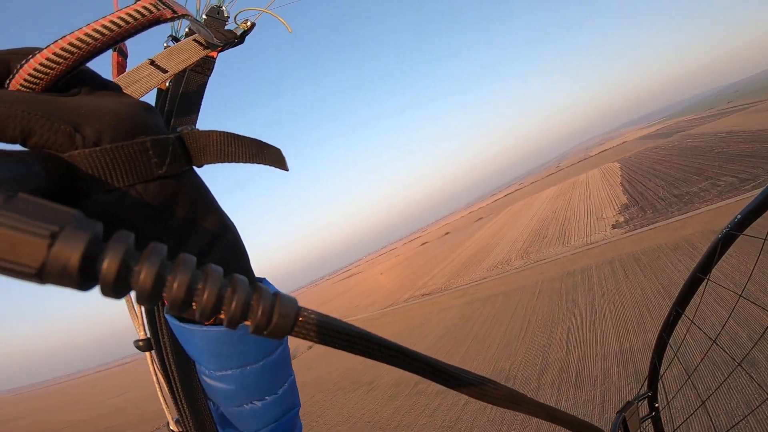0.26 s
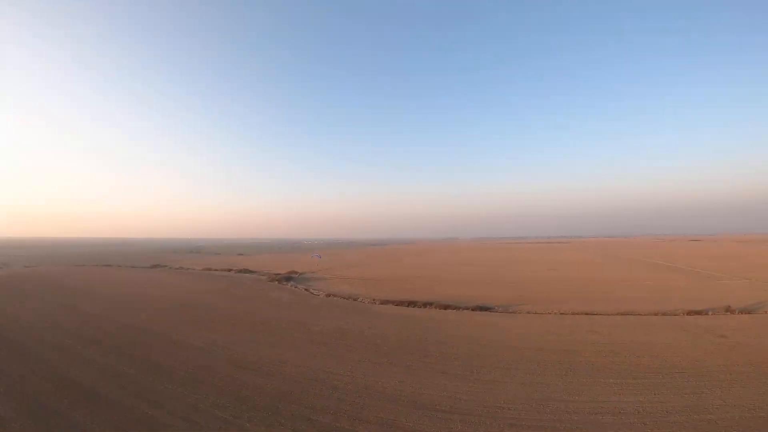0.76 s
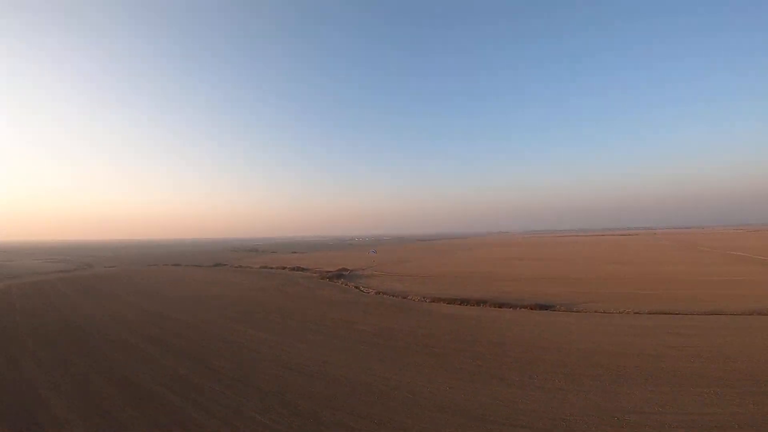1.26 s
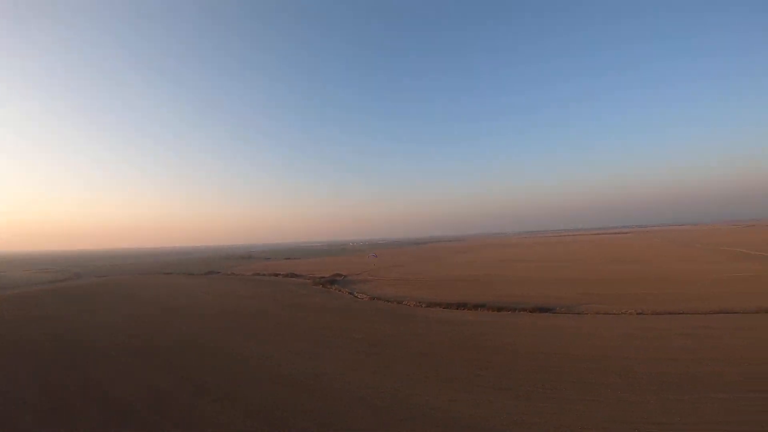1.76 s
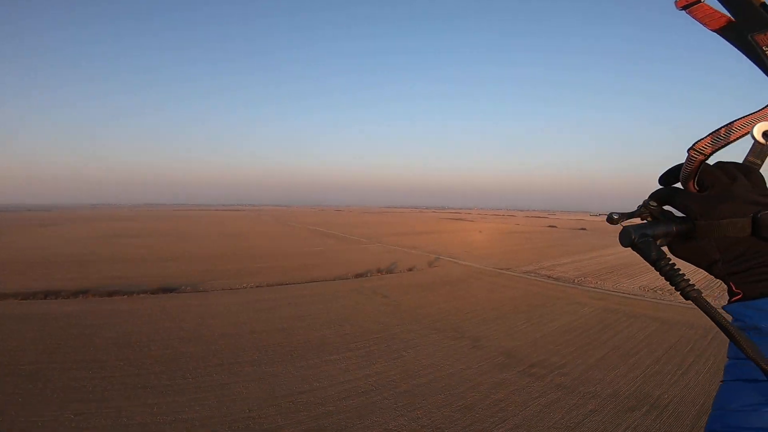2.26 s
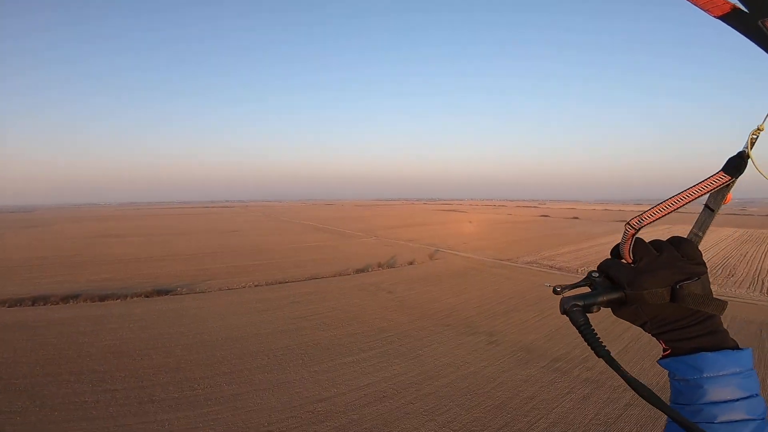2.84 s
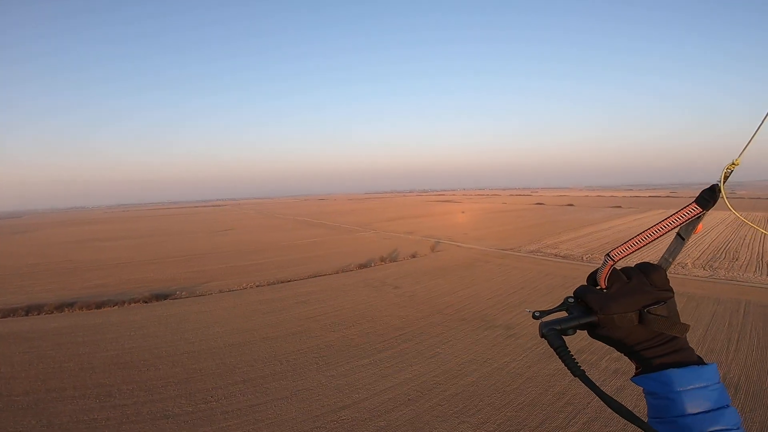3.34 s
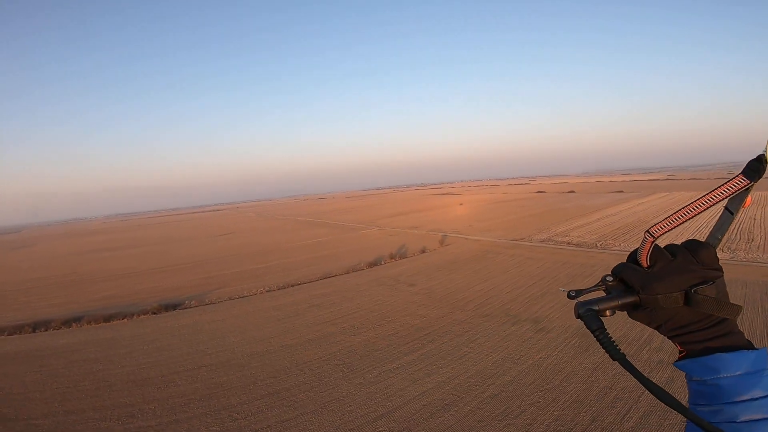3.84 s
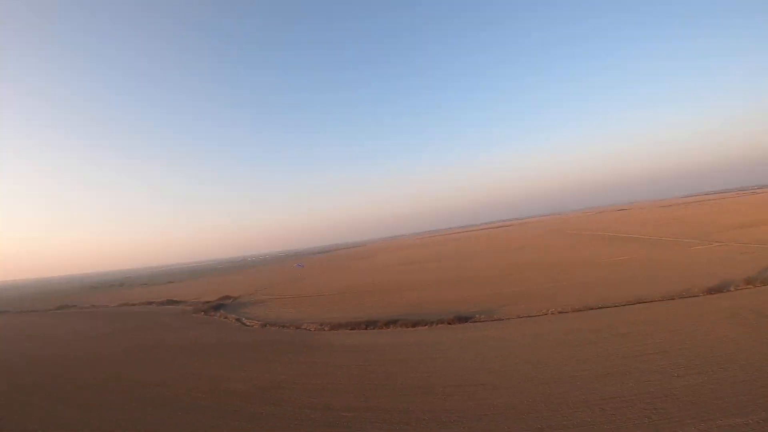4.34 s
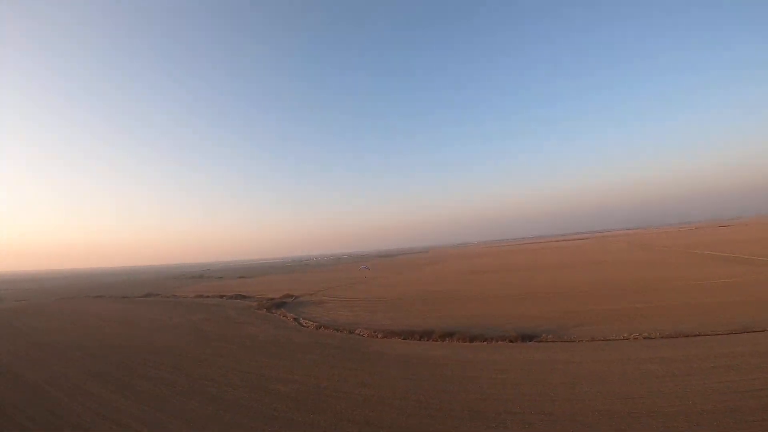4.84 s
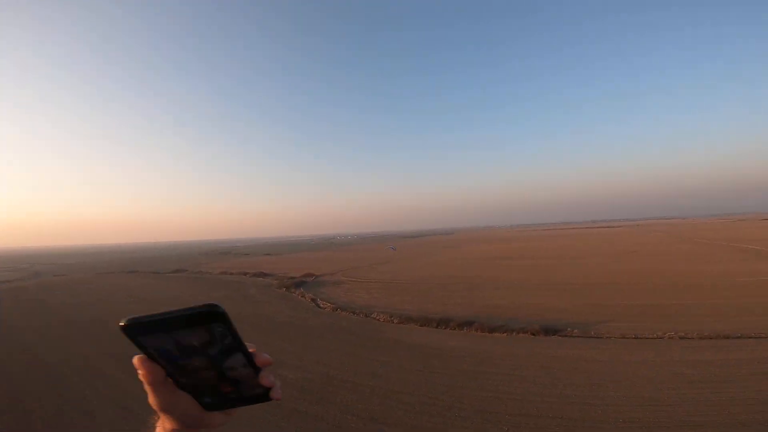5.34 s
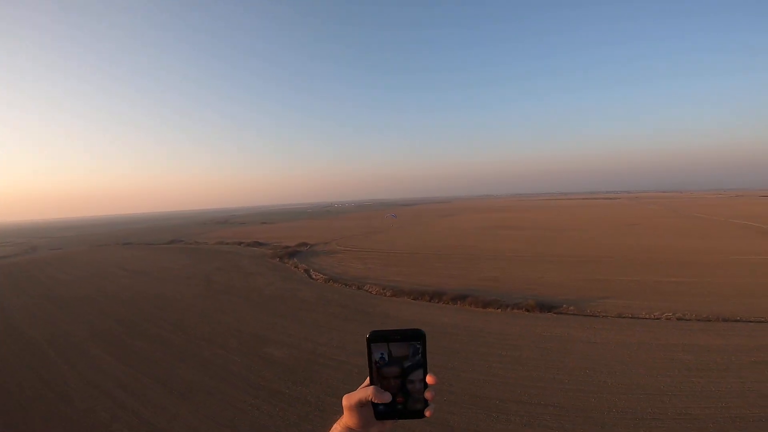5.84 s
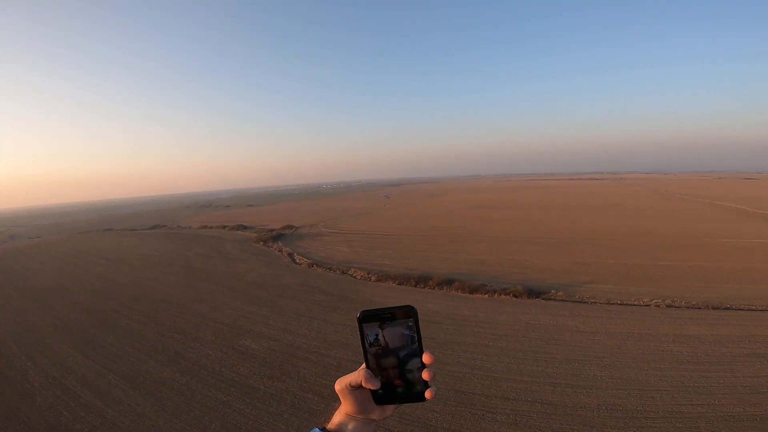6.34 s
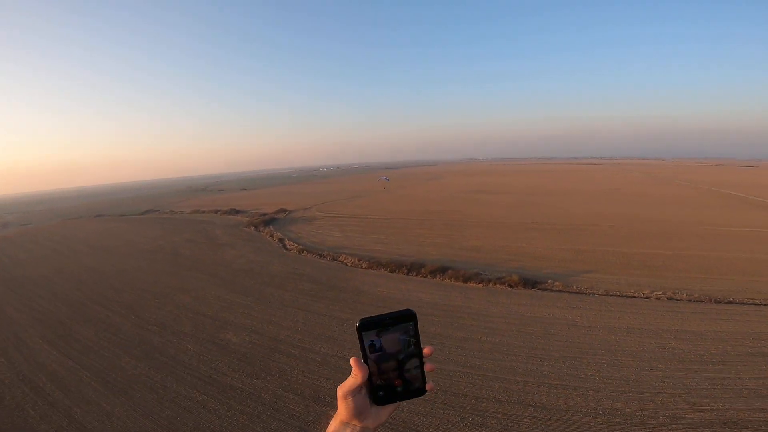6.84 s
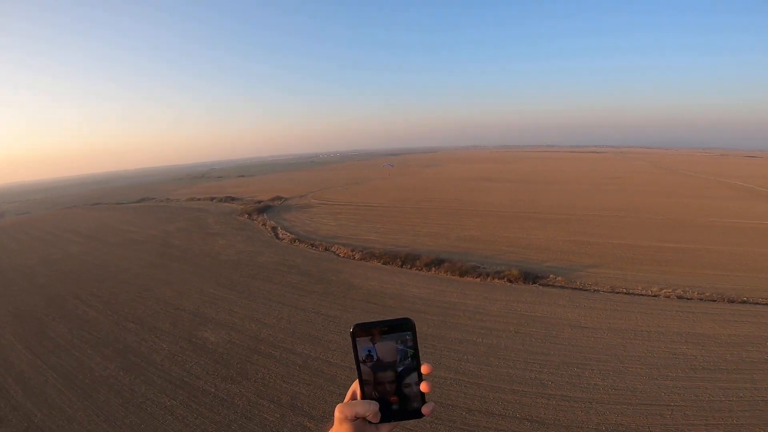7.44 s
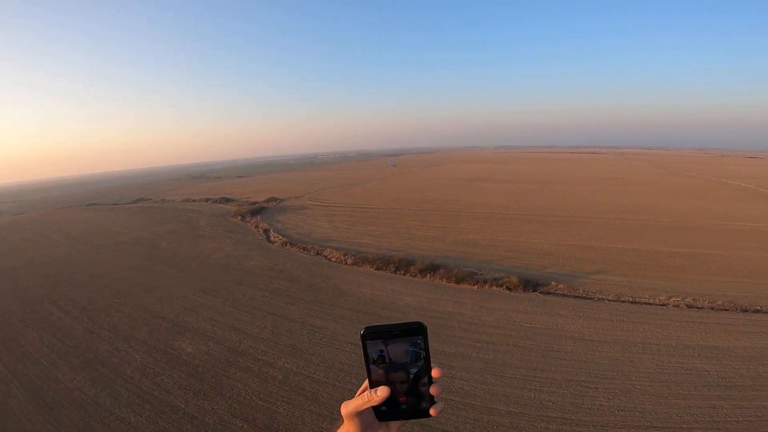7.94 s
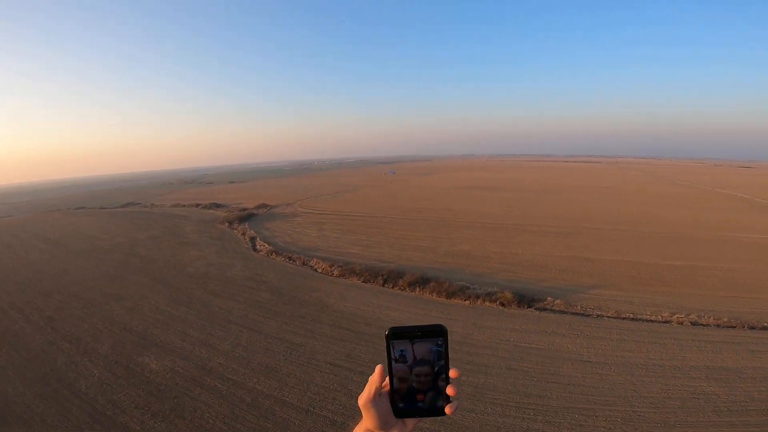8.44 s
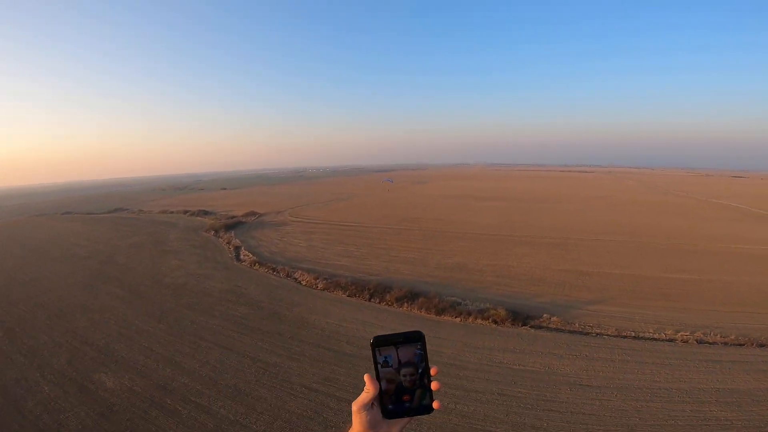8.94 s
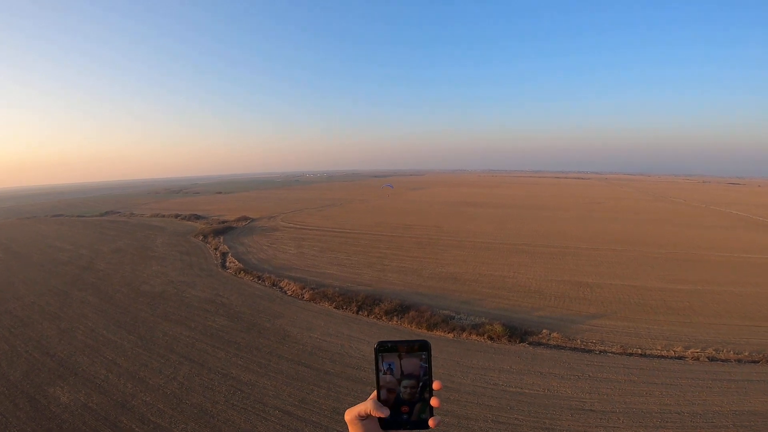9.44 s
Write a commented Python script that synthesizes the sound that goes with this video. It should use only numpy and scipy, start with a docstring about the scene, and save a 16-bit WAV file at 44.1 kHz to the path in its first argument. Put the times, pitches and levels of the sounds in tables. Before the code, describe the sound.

A dense low motor hum with raspy exhaust and fast blade chopping fills everything, heard from the pilot's helmet in flight. Faint gear clicks come early, wind gusts thud, and the engine revs up modestly. Short hollow wind booms follow near five seconds, then the throttle eases and the drone gradually drops, with sharper slaps and a whistling edge.

```python
"""Paramotor over fields, from the pilot's helmet

The microphone rides on the helmet, close to a two-blade propeller geared to a two-stroke engine.
The throttle opens a little, then eases off. Blade waves and slaps are summed with exhaust overtones,
ringing metal and shaped noise for the airstream. Each changes as the head turns and then bows."""
import sys
import numpy as np
from scipy.fft import rfft, irfft, next_fast_len
from scipy.io import wavfile
from scipy.ndimage import uniform_filter1d, map_coordinates

SR = 44100
rng = np.random.default_rng(int(sys.argv[2]) if len(sys.argv) > 2 else 0)


def bounce(signal):
    """Save signal as a 16-bit WAV file at the path given by the first command-line argument."""
    frames = np.transpose(np.atleast_2d(signal))
    limited = np.clip(frames, -1, 1)
    pcm = np.round(limited * 32767).astype(np.int16)
    wavfile.write(sys.argv[1], SR, pcm)


N = 426888
STEP = 64  # samples between values of a slow control curve


def amp(db):
    """Decibels to gain."""
    return 10 ** (np.asarray(db) / 20)


def unit(x):
    """x scaled to rms 1."""
    return x / np.sqrt(np.mean(x ** 2) + 1e-20)


def seconds():
    """The time of every sample."""
    return np.arange(N) / SR


def curve(rows):
    """One value per sample, on straight lines between (seconds, value) rows."""
    s, value = np.transpose(rows)
    return np.interp(seconds(), s, value)


def wobble(rate):
    """A smooth random curve, rate knots a second."""
    knots = rng.standard_normal(int(N * rate / SR) + 4)
    coarse = np.arange(0, N, 32)
    return np.interp(np.arange(N), coarse, map_coordinates(knots, [coarse * rate / SR]))


def noise():
    """Fresh white noise."""
    return rng.standard_normal(N)


def filtered(x, response):
    """x times a complex response of frequency."""
    m = next_fast_len(N + 8192, True)
    return irfft(rfft(x, m) * response(np.fft.rfftfreq(m, 1 / SR)), m)[:N]


def lowpassed(x, edge_hz):
    """x with the treble above edge_hz rolled off."""
    return filtered(x, lambda hz: 1 / (1 + (hz / edge_hz) ** 6))


def coloured(x, points):
    """x shaped by a (Hz, dB) spectrum, at rms 1."""
    f, db = np.transpose(points)
    return unit(filtered(x, lambda hz: amp(np.interp(np.log(hz + 1), np.log(f), db, right=-120))))


def rung(x, modes):
    """x through parallel resonances of alternating sign, at rms 1."""
    def response(f):
        total = 0
        for k, (centre, width, db) in enumerate(modes):
            damping = 1j * f * width
            total = total + (-1) ** k * amp(db) * damping / (centre * centre - f * f + damping)
        return total
    return unit(filtered(x, response))


def in_tune(rate, centre, width):
    """Gain of a resonance driven at this rate."""
    return 1 / np.hypot(1, 2 * (rate - centre) / width)


def bent(x):
    """Bending round the pilot, the low part of each slap arrives a little after its edge."""
    return filtered(x, lambda hz: np.exp(-12j * np.arctan(hz / 800)))


def pulses(cycles, jitter_s, scatter_db):
    """One impulse per whole cycle, each a little off in time and size."""
    at = np.interp(np.arange(np.ceil(cycles[0]), cycles[-1]), cycles, np.arange(N))
    late, size = rng.standard_normal((1024, 2))[:len(at)].T
    at = np.clip(at + late * jitter_s * SR, 0, N - 2)
    i, gain = at.astype(int), amp(scatter_db * size)
    # each impulse is shared between its two neighbouring samples
    return np.bincount(i, gain * (1 - at + i), N) + np.bincount(i + 1, gain * (at - i), N)


def bursts(cycles, width, between, scatter_db):
    """An envelope at rms 1 that swells once a cycle to a new height; width is in cycles."""
    nearest = np.round(cycles)
    height = amp(scatter_db * rng.standard_normal(1024))[nearest.astype(int)]
    return unit(between + height * np.exp(-abs(cycles - nearest) / width))


def swell(s, half_s):
    """A smooth rise and fall around s, down to 1/e after half_s."""
    return np.exp(-np.minimum(abs(seconds() - s) / half_s, 10) ** 2)


def tone(turns):
    """A cosine of a phase counted in turns."""
    return np.cos((2 * np.pi * (turns - np.floor(turns))).astype(np.float32))


def held(gain):
    """A slow gain, each value held for STEP samples."""
    return np.repeat(gain, STEP)[:N]


def harmonics(cycles, orders, waver_db, scatter):
    """Wavering overtones at rms 1; they peak together once a cycle unless scattered."""
    bow, out = bowed()[::STEP], np.zeros(N)
    for k, up_db, bowed_db in orders:
        gain = amp(up_db + (bowed_db - up_db) * bow + waver_db * wobble(5.9)[::STEP])
        out += held(gain) * tone(round(k) * cycles + scatter * rng.random())
    return unit(out)


def gliding(cycles, multiples, spectrum, waver_db, blur):
    """Overtones that each swell and fade as the speed carries them across a fixed spectrum."""
    hz, db = np.transpose(spectrum)
    rate, out = np.gradient(cycles)[::STEP] * SR, np.zeros(N)
    for k in multiples:
        gain = amp(np.interp(k * rate, hz, db) + waver_db * wobble(5.9)[::STEP])
        out += held(gain) * tone(k * cycles + (blur * wobble(14) if blur else 0))
    return np.sqrt(2) * out


# the pilot bows the head to a phone and keeps it there
BOW_S, BOW_TAKES_S = 5.17, 0.86


def bowed():
    """How far the head is bowed, 0 to 1."""
    return np.clip((seconds() - BOW_S) / BOW_TAKES_S, 0, 1)


# The pilot looks round. Each row: time in seconds, head angle in degrees to the right.
YAW = [(.73, 69), (.82, -51), (.95, -20.5), (1.35, -14), (1.8, 5), (2.03, -2), (2.22, 19), (2.7, 36),
       (4.2, 40.5), (4.7, 7), (5.15, 5), (5.35, -3.5), (6.4, 2)]
# Directions of the head: left, ahead, right, far over the shoulder, in degrees.
BEARINGS = [-30, 0, 35, 65]


def facing(around):
    """A value given for each direction, followed smoothly as the head turns."""
    t = np.arange(0, N, STEP) / SR
    value = np.interp(np.interp(t, *np.transpose(YAW)), BEARINGS, around)
    return np.interp(seconds(), t, uniform_filter1d(value, size=110, mode="nearest"))  # over 0.16 s


# How each sound reaches the helmet, before any trim of its own. Each row: gain in dB facing left,
# ahead, right and over the shoulder, then dB added with the head bowed.
REACH = { "octave": (-37.5, -27, -32, -19, -20), "third": (-26, -38, -50.5, -41, -15),
         "thump": (-6, -5, -1, -2, 4), "slap": (-31, -35.5, -33, -32, -9.5),
         "early": (-46, -46, -37, -48, 3), "crack": (-55, -48, -38, -47.5, -14),
         "hollow": (-56, -38, -43, -62, -5), "whistle": (-58, -52, -43, -58, 4),
         "pipe": (-42, -29.5, -29, -43, 3.5), "silencer": (-52, -42, -35.5, -49, 5),
         "whine": (-42, -30, -31, -54, -3.5), "chop": (-27, -27, -25, -33, -2),
         "clatter": (-48, -40.5, -37.5, -36, 5), "frame": (-62, -66.5, -74.5, -76, 18),
         "buffet": (-23, -29, -36.5, -44, -1.5), "rush": (-29, -23, -20.5, -20.5, 0),
         "swish": (-33, -33.5, -28, -33, 0)}


def reach(name):
    """Gain of one sound at the helmet, as the head turns and bows."""
    *around_db, bowed_db = REACH[name]
    return amp(facing(around_db) + bowed_db * bowed())


# Each row: time in seconds, propeller speed in blade passes per second.
SPEED = [(0, 59.29), (2, 59.44), (2.5, 59.62), (3, 60.95), (3.5, 63.04), (3.8, 63.44), (4.1, 63.15),
         (4.6, 62.5), (5, 61.62), (5.5, 59.04), (6, 57.86), (6.5, 56.78), (7, 55.63), (7.5, 54.96),
         (8, 54.2), (8.5, 52.99), (9, 51.7), (9.68, 50.62)]


def blade_rate():
    """Blade passes per second as the throttle opens and eases off."""
    return curve(SPEED)


# Gusts on the microphone. Each row: centre in seconds, half length in seconds,
# buffet and rush in dB before the trims in buffet() and rush().
GUSTS = [(1.462, 0.19, -25, -27.5), (1.904, 0.072, -23, -19), (2.212, 0.11, -41, -18.5),
         (2.65, 0.29, -42, -23.5), (4.555, 0.16, -24.5, -20), (5.05, 0.11, -28, -24.5),
         (9.357, 0.76, -24.5, -24)]


def gusts():
    """Gains of buffet and rush: each gust adds its power to the steady airstream."""
    buffet_power, rush_power = reach("buffet") ** 2, reach("rush") ** 2
    for s, half_s, buffet_db, rush_db in GUSTS:
        gust = swell(s, half_s)
        buffet_power = buffet_power + gust * amp(buffet_db) ** 2
        rush_power = rush_power + gust * amp(rush_db) ** 2
    return np.sqrt(buffet_power), np.sqrt(rush_power)


# Spectrum of the wind's low buffeting. Each row: frequency in Hz, relative level in dB.
BUFFET = [(8, -14), (22, -2.5), (50, 3.5), (85, 0), (130, -3.5), (220, -12.5), (500, -40), (2000, -94)]


def buffet(gain):
    """Low turbulent pressure on the microphone, slightly uneven."""
    return gain * amp(1.5) * unit(amp(0.32 * wobble(8.4)) * coloured(noise(), BUFFET))


# Spectrum of the rushing wash. Each row: frequency in Hz, relative level in dB.
RUSH = [(30, -29.5), (110, -0.5), (200, -2), (290, 1), (400, -3), (560, -3.5), (700, -2.5), (900, -4.5),
        (1300, -9.5), (2000, -16), (4000, -29), (9000, -85.5)]
# Steady share of the wash between blades, one for each direction of the head (no unit).
WASH_BETWEEN = [.6, 1, .75, .3]


def rush(gain, wake, eddies):
    """Turbulent wash that surges with every blade."""
    surge = bursts(wake, width=.3, between=facing(WASH_BETWEEN), scatter_db=.2)
    return gain * amp(-3.5) * coloured(noise() * eddies * surge, RUSH)


# Spectrum of the swish. Each row: frequency in Hz, relative level in dB.
SWISH = [(400, -42.5), (1000, 4), (1600, 3.5), (2300, -3), (3100, -4.5), (3700, -12), (4500, -16),
         (5500, -41.5), (7000, -49.5), (12000, -79.5)]
# Length of each swish in blade passes, one for each direction of the head.
SWISH_WIDTH = [.13, .17, .15, .09]


def swish(wake, eddies):
    """Each blade slices the air, with more noise between blades once the head is bowed."""
    slices = bursts(wake, width=facing(SWISH_WIDTH), between=.12 + .33 * bowed(), scatter_db=.8)
    return reach("swish") * amp(-3.0) * coloured(noise() * eddies * slices, SWISH)


# Spectrum of the airstream's treble. Each row: frequency in Hz, relative level in dB.
HISS = [(3000, -4.5), (5000, 6), (6300, -3), (7700, 0), (8700, -5), (9800, -11), (10700, -19),
        (11500, -19.5), (13000, -33.5), (15000, -34.5)]
# Each row: time in seconds, level of the hiss in dB before the trim below.
HISS_LEVEL = [(0.1, -61.5), (0.78, -60.5), (1.22, -56.5), (1.9, -55), (2.3, -58.5), (2.82, -54),
              (4.26, -53.5), (4.5, -50), (5.65, -59.5), (6.8, -57), (6.91, -59.5), (9.5, -58.5)]


def hiss(wake):
    """Steady treble noise with a small, uneven surge at each blade."""
    surge = bursts(wake, width=.15, between=2.1, scatter_db=4.5)
    return amp(curve(HISS_LEVEL) + 3.5) * coloured(noise() * surge, HISS)


def air(blade):
    """Wind buffets the microphone; the turbulent wash surges with every blade."""
    buffet_gain, rush_gain = gusts()
    wake = blade - .6 - facing(SLAP_LAG)
    eddies = amp(.5 * wobble(30))
    return buffet(buffet_gain) + rush(rush_gain, wake, eddies) + swish(wake, eddies) + hiss(wake)


# The wind briefly booms in the helmet. Each row: centre in seconds, half length in seconds,
# frequency in Hz, peak level in dB.
BOOMS = [(1.92, 0.062, 92, -24), (4.62, 0.018, 89.6, -27), (4.801, 0.062, 86.3, -17.5),
         (5.05, 0.056, 127, -18), (5.656, 0.036, 88.3, -16)]


def booms():
    """Each eddy at the helmet's rim makes a low hollow note swell and die."""
    out = np.zeros(N)
    for s, half_s, hz, db in BOOMS:
        note = np.cos(2 * np.pi * (hz * seconds() + rng.random()))
        out += amp(db) * swell(s, half_s) * note
    return out


# Small ticks of the gear on the pilot. Each row: start in seconds, level in dB.
TICKS = [(.346, -26), (.356, -22), (.363, -26), (4.47, -40), (9.195, -28)]


def ticks():
    """Buckles and the throttle grip click: a decaying 3100 Hz ping with a little noise."""
    out, t = np.zeros(N + SR), np.arange(SR // 10) / SR
    for s, db in TICKS:
        # the ping falls 60 dB in 9 ms, the noise in 6 ms
        ping = np.sin(2 * np.pi * 3100 * t) * amp(-60 * t / .009)
        scrape = .2 * rng.standard_normal(len(t)) * amp(-60 * t / .006)
        out[round(s * SR):][:len(t)] += amp(db) * (ping + scrape)
    return lowpassed(out[:N], edge_hz=7000)


# The frame's thin metallic ring. Each row: frequency in Hz, width in Hz, relative level in dB.
FRAME = [(4270, 90, -8), (9800, 600, -28.5)]


def frame(rate):
    """The frame rings most as the engine passes through one firing rate."""
    ring = lowpassed(rung(noise(), FRAME), edge_hz=9200)
    return reach("frame") * in_tune(rate, centre=67.7, width=2.9) * ring  # firings per second


# Resonances of the engine casing. Each row: frequency in Hz, width in Hz, relative level in dB.
CASING = [(1750, 250, 0.5), (2985, 420, 0), (4540, 650, -7), (7700, 1100, -24.5), (9700, 500, -34)]
# A narrow hissy ring of the casing. Each row: frequency in Hz, width in Hz, relative level in dB.
CASING_RING = [(2940, 130, 0)]
# Each row: time in seconds, level of the hissy ring in dB.
CASING_RING_LEVEL = [(0, -47), (.65, -43), (.9, -59.5), (5.3, -55), (6.2, -46), (7.6, -51.5), (8.4, -42),
                     (9.4, -38)]


def casing(firing):
    """Each firing shakes the casing, which clatters broadly and rings in one narrow band."""
    shaking = noise() * bursts(firing, width=0.13, between=.4, scatter_db=1)
    clatter = reach("clatter") * lowpassed(rung(shaking, CASING), edge_hz=4170)
    hissy_ring = rung(lowpassed(shaking, edge_hz=4000), CASING_RING)
    return clatter + amp(curve(CASING_RING_LEVEL)) * hissy_ring


def whine(firing, rate):
    """The tenth engine order whines in a sharp resonance of the silencer."""
    order = unit(np.cos(2 * np.pi * 10 * firing + .2 * wobble(10)))
    tuned = in_tune(10 * rate, centre=726, width=36)  # Hz
    return reach("whine") * tuned * amp(.9 * wobble(7)) * order


# Exhaust tones chopped by the blades. Each row: firing multiple, blade multiple added to it,
# relative level in dB head up, relative level in dB head bowed.
SIDE_TONES = [(1, 0, 1, -3), (1, 1, 7, 2.5), (1, 2, 4, -3.5), (1, 3, -13.5, -6.5), (3, 1, -5.5, -7),
              (4, 1, -22, 0.5)]


def chopped(firing, blade):
    """The blades cut through the exhaust stream, giving tones at sums of their rates, at rms 1."""
    bow, out = bowed()[::STEP], np.zeros(N)
    for fires, passes, up_db, bowed_db in SIDE_TONES:
        gain = held(amp(up_db + (bowed_db - up_db) * bow))
        out += gain * tone(round(fires) * firing + round(passes) * blade + rng.random())
    return unit(out)


# Harmonics of the exhaust pipe. Each row: firing multiple, relative level in dB head up,
# relative level in dB head bowed.
PIPE = [(2, -0.5, 5.5), (3, 3, 5.5), (4, 4.5, -3), (5, -3.5, -7.5), (6, 0, -17), (7, -0.5, -12)]
# Response of the silencer, which the higher harmonics glide through.
# Each row: frequency in Hz, relative level in dB.
SILENCER = [(540, -11), (585, -2.5), (615, 4), (650, -4), (695, 4), (755, -2), (810, -8), (880, -9),
            (950, -16.5), (1050, -13), (1150, -7.5), (1300, -15.5), (1550, -9.5)]


def exhaust(firing):
    """Low firing harmonics drone in the pipe while higher ones sing through the silencer."""
    drone = harmonics(firing, PIPE, waver_db=.9, scatter=.2)
    singing = gliding(firing, (8, 11, 12, 13, 15, 19, 20), SILENCER, waver_db=1, blur=.03)
    return reach("pipe") * drone + reach("silencer") * singing


def engine(firing, blade):
    """One firing per turn drones in the pipe, sings in the silencer and shakes casing and frame."""
    rate = np.gradient(firing) * SR
    side_tones = reach("chop") * chopped(firing, blade)
    return exhaust(firing) + whine(firing, rate) + side_tones + casing(firing) + frame(rate)


# Spectrum that the whistle glides through. Each row: frequency in Hz, relative level in dB.
WHISTLE = [(930, -12), (1000, -3), (1060, -5), (1130, -10), (1200, -3), (1265, 2), (1320, -8), (1410, -4),
           (1520, -8)]


def whistle(trough):
    """High blade harmonics whistle from the blade tips."""
    tips = gliding(trough, range(17, 25), WHISTLE, waver_db=1.2, blur=.06)
    return -reach("whistle") * bent(tips)


# Resonances of the hollow. Each row: frequency in Hz, width in Hz, relative level in dB.
HOLLOW = [(623, 50, -5.5), (670, 53, 2), (790, 70, -0.5)]
# The hollow rings louder at speeds where a blade harmonic meets it.
# Each row: speed in blade passes per second, added level in dB.
RING_BY_SPEED = [(51.8, 0), (54, -10), (56.5, -0.5), (59.4, 2), (61.3, 2), (63, 5)]


def hollow_ring(trough):
    """A burst of noise at each blade rings the hollow."""
    speed_db = np.interp(blade_rate(), *np.transpose(RING_BY_SPEED))
    struck = noise() * bursts(trough, width=0.036, between=0, scatter_db=0.5)
    return amp(speed_db) * reach("hollow") * lowpassed(rung(struck, HOLLOW), edge_hz=1000)


# Response of the hollow to higher blade harmonics. Each row: frequency in Hz, relative level in dB.
HOWL = [(440, -14), (520, -7), (565, -10), (598, -2), (617, 1), (648, -1), (680, 2), (705, -2), (745, -2),
        (790, -6), (835, -15)]
# Each row: time in seconds, gain of the howl in dB.
HOWL_LEVEL = [(0, -65), (1.5, -62), (2.05, -34.5), (2.4, -34.5), (3.2, -40), (4.2, -39.5), (4.6, -33.5),
              (4.8, -32), (5.17, -31), (5.28, -37), (6.5, -36), (8.2, -40), (9.2, -32), (9.68, -34)]


def howl(trough):
    """Higher blade harmonics howl as they glide through the hollow."""
    return -amp(curve(HOWL_LEVEL)) * bent(gliding(trough, range(8, 15), HOWL, waver_db=.6, blur=0))


# Harmonics of the blade thump. Each row: blade multiple, relative level in dB head up,
# relative level in dB head bowed.
THUMP = [(3, 0, -0.5), (4, 2.5, 1.5), (5, 1, 3.5), (6, -2, -5)]
# Level of the blade thump. Each row: time in seconds, gain in dB, added to the thump's reach.
THUMP_LEVEL = [(0.0, -27.5), (0.78, -29.5), (0.81, -25.5), (1.64, -23.5), (1.97, -18.5), (2.08, -25),
               (2.1, -21), (3.12, -25.5), (4.2, -24.5), (4.61, -25.5), (5.15, -31), (6.23, -20.5),
               (6.25, -23.5), (7.79, -20.5), (8.84, -22.5), (9.68, -23.5)]


def thump(trough):
    """Low harmonics of each blade's suction, with a separate tone at the third."""
    low = harmonics(trough, THUMP, waver_db=.6, scatter=0)
    third = reach("third") * np.cos(2 * np.pi * 3 * trough)
    return -reach("thump") * amp(curve(THUMP_LEVEL)) * low - third


# Spectrum of the direct slap. Each row: frequency in Hz, relative level in dB.
SLAP = [(330, -22), (410, 6), (520, 2.5), (650, -3), (900, -2), (1080, -5.5), (1260, -8), (1500, -14.5),
        (2000, -17.5), (3500, -29), (6000, -65)]
# Spectrum of the early slap. Each row: frequency in Hz, relative level in dB.
EARLY_SLAP = [(350, -22.5), (900, -4.5), (1500, -2), (2500, -12.5), (4000, -17.5), (6000, -57.5)]
# Spectrum of the late crack. Each row: frequency in Hz, relative level in dB.
CRACK = [(500, -25), (1200, -6.5), (2000, -1), (2800, -3), (4200, -15.5), (6000, -44)]
# the slap also arrives by a shorter and a longer way round the pilot (blade passes)
EARLY, LATE = .24, .22


def slaps(trough):
    """A suction spike at each blade, and noise bursts before and after it by the other two paths."""
    spikes = -pulses(trough, jitter_s=.00003, scatter_db=.8)
    before = noise() * bursts(trough + EARLY, width=0.039, between=0, scatter_db=1)
    after = noise() * bursts(trough - LATE, width=0.026, between=0, scatter_db=2.2)
    slap = reach("slap") * coloured(bent(spikes), SLAP)
    return slap + reach("early") * coloured(before, EARLY_SLAP) + reach("crack") * coloured(after, CRACK)


# Each row: time in seconds, level of the propeller's hum in dB before a trim of 0.1 dB.
HUM_LEVEL = [(0.0, -12), (0.05, -14.5), (0.62, -13.5), (0.97, -20), (1.02, -15.5), (1.13, -18), (2.59, -14),
             (4.02, -12.5), (4.69, -15), (5.1, -12), (5.96, -16.5), (6.44, -13.5), (7.14, -15), (9.03, -15),
             (9.17, -21), (9.19, -17), (9.65, -15.5), (9.68, -18)]


def hum(blade):
    """The smooth pressure wave of each blade, with its octave."""
    fundamental = amp(curve(HUM_LEVEL) + 0.1) * np.cos(2 * np.pi * blade)
    octave = reach("octave") * np.cos(2 * np.pi * 2 * (blade + .04))
    return np.sqrt(2) * (fundamental + octave)


# Lag of the slap in blade passes, one for each direction of the head; the wake shares it.
SLAP_LAG = [0, -.03, .02, .15]


def propeller(blade):
    """Each blade pushes a smooth pressure wave, with a sharp suction that arrives by three paths."""
    trough = blade - .57 - facing(SLAP_LAG)
    tonal = hum(blade) + thump(trough) + howl(trough) + whistle(trough)
    return tonal + slaps(trough) + hollow_ring(trough)


def scene():
    """The reduction gear locks the engine to the propeller."""
    turned = np.cumsum(blade_rate()) / SR  # blade passes so far
    blade = turned + .283
    firing = turned * 1.222  # firings per blade pass
    return (air(blade) + booms() + ticks() + engine(firing, blade) + propeller(blade))[None]


def record(dry):
    """The highest peaks are rounded off and nothing from 15 kHz up is kept."""
    rounded = dry[0] / (1 + (dry[0] / .8) ** 6) ** (1 / 6)
    return filtered(rounded, lambda hz: hz < 15000)[None]


dry = scene()
out = record(dry)
bounce(out)
```